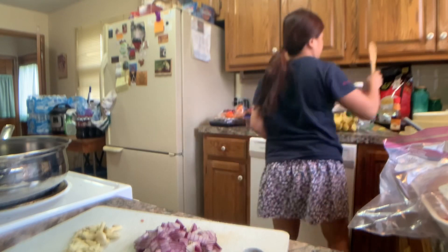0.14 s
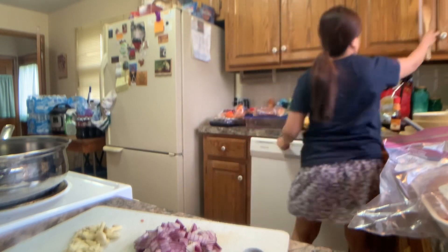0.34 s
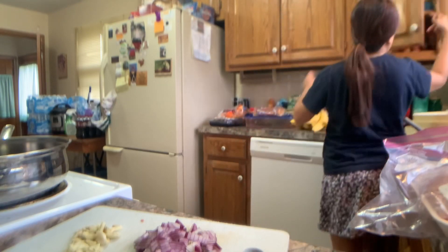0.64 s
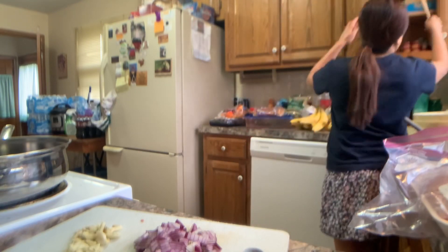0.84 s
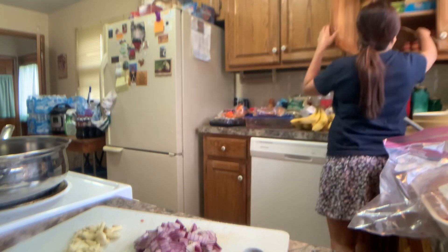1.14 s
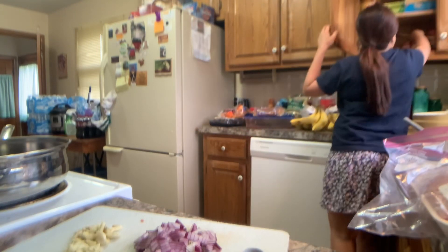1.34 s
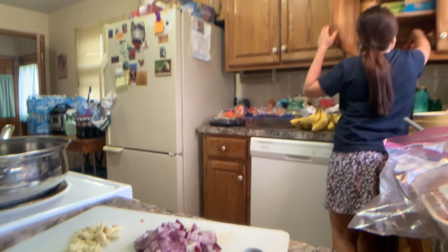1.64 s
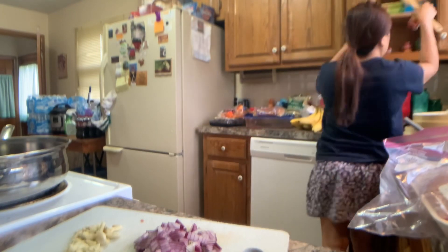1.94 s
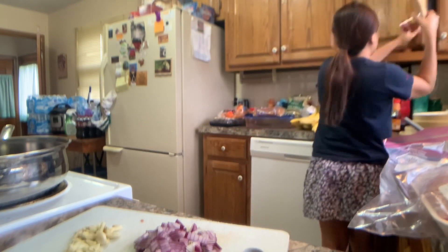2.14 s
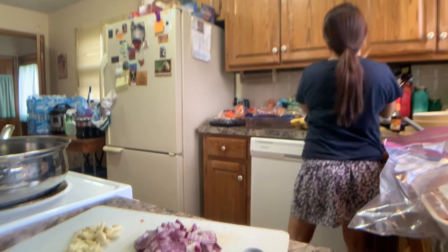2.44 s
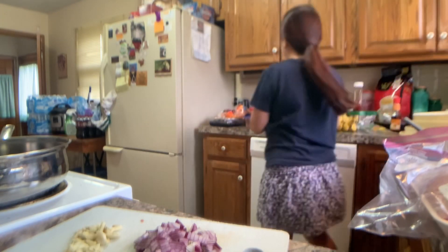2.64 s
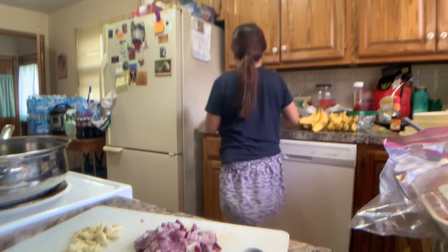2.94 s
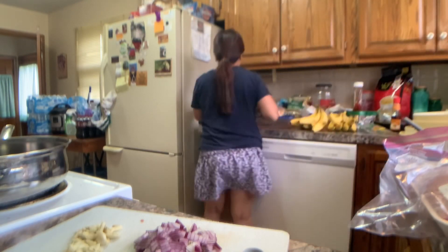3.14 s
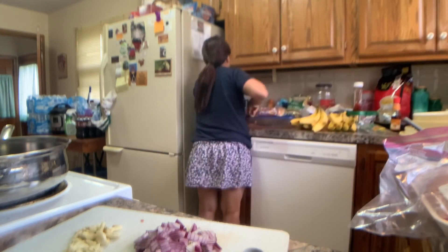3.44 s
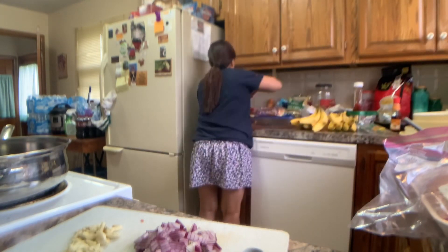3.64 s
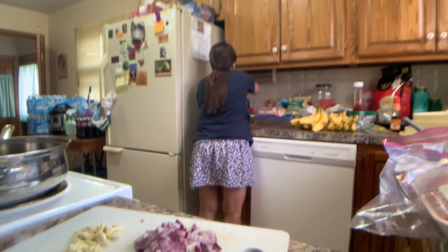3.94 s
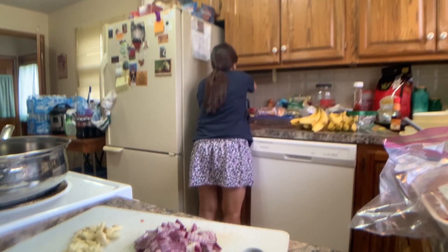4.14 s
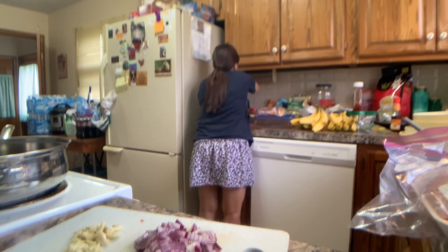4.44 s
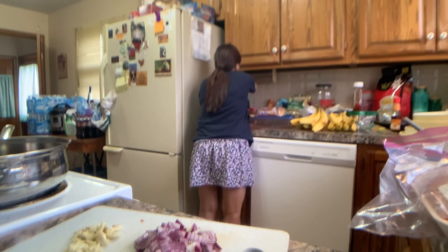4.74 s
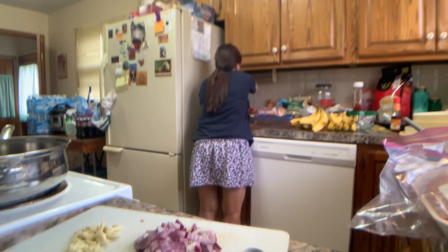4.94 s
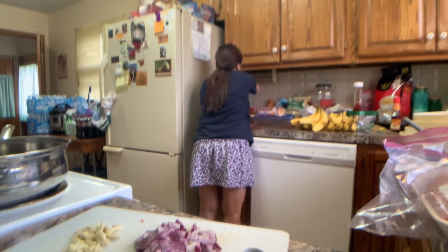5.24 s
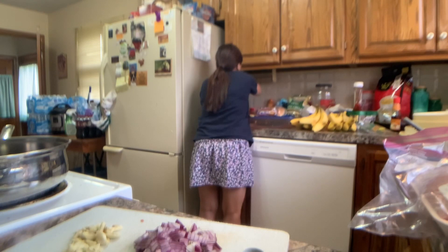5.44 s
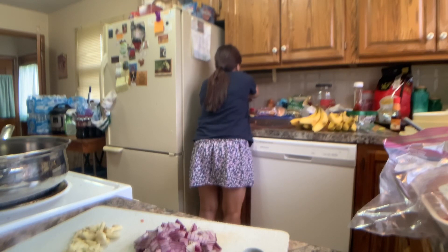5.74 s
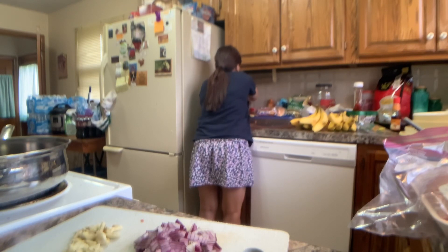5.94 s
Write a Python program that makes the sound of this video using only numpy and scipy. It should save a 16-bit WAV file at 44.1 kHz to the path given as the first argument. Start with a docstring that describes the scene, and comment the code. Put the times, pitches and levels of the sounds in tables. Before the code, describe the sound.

A low, slightly unsteady refrigerator hum with soft fan noise runs throughout a small, fairly dry kitchen, heard in stereo from a few steps away. At 0.1-0.5 s a dishwasher door closes: light click, strong clack at 0.3 s, dull thuds and movement. A cupboard catch snaps at 1.2 s. Between 1.4 and 1.75 s tins and jars knock on the shelf, with a brief scrape and a bright hard knock near 1.57 s. At about 2.5 s the cupboard door slams with a deep, short boom, the loudest event. Cloth and hands rustle around 2.9-3.5 s, with a clunk of dish and pot at 3.25-3.4 s and a low footstep-like thud. From 3.9 to 5.8 s come sparse, quiet taps, small ticks and faint crinkles on the worktop. Just after 6.0 s a rough, groaning drag on wood rises abruptly as it ends.

```python
"""A refrigerator hums throughout (tones and fan noise) in a kitchen heard by a two-port microphone.
A dishwasher door latches; jars and tins knock and slide on a cupboard shelf; the cupboard door thumps shut.
Then small things are set down on the worktop, and last something starts to drag on wood (stick-slip pulses).
Knocks are noise bursts with decaying modes, thuds are panel modes with rattle; hands, feet and clothes
shuffle along the way as rubbing noise. Struck and sliding things get a diffuse room tail."""
import sys
import numpy as np
from scipy import signal
from scipy.fft import rfft, irfft, next_fast_len
from scipy.io import wavfile
from scipy.ndimage import uniform_filter1d, map_coordinates

SR = 44100
rng = np.random.default_rng(int(sys.argv[2]) if len(sys.argv) > 2 else 0)


def log_audio(samples):
    """Write samples as a 16-bit WAV file to the path given in sys.argv[1]."""
    # one column per channel
    frames = np.atleast_2d(samples).T
    # limit to full scale, then quantise
    limited = np.clip(frames, -1, 1)
    pcm = np.round(limited * 32767).astype(np.int16)
    wavfile.write(sys.argv[1], SR, pcm)


N = 268123

# compressor tones: pitch_hz, level_db (rms)
HUM_TONES = [(91.5, -50.5), (172.3, -61), (211.5, -53), (366.1, -63.5), (393.0, -62), (855.9, -77),
             (995.9, -68)]
# fan noise colour: freq_hz, density_db (relative)
FAN_SPECTRUM = [(25, -41.5), (70, -10), (105, 3.5), (140, -11.5), (212, 2), (309, -13.5), (400, -1.5),
                (560, -5.5), (660, -27.5), (780, -11), (1000, -15.5), (1300, -17.5), (1480, -26.5),
                (1700, -20.5), (2600, -30), (5500, -46), (9500, -42.5), (12000, -45), (13000, -75)]
FAN_DB = -50.5

# rubbing noise colour: freq_hz, density_db (relative)
RUSTLE_SPECTRUM = [(300, -36), (700, -6), (1500, -0.5), (3000, -3), (4200, -3), (6000, -7.5), (8000, -9),
                   (10300, -7), (12000, -9), (13000, -25.5), (16000, -19)]
# faint rustle of clothes: time_s, level_db
CLOTHES = [(0, -67.5), (.6, -67), (.8, -74.5), (1.0, -65.5), (1.15, -73), (1.4, -78), (2.0, -72.5),
           (2.2, -77.5), (2.3, -70.5), (2.44, -64), (2.72, -72), (3.58, -71), (3.8, -62.5), (3.92, -69.5),
           (3.97, -79), (5.25, -92), (5.36, -68.5), (5.58, -82)]
CLOTHES_TILT_DB = 2
# strokes of hands, cloth and sliding things: start_s, swell_s, held_s, level_db, treble_tilt_db
STROKES = [(.09, 0.056, 0.25, -60, -0.5), (0.359, 0.03, 0.071, -57.5, 2.5), (0.701, 0.16, 0.038, -60, 3),
           (1.476, 0.057, 0.088, -47, 0.5), (1.68, 0.14, 0.047, -61, -6), (2.5, 0.055, 0.108, -63, 1),
           (2.8, 0.16, 0.16, -63, 2.5), (2.932, 0.048, 0.0389, -51, 6), (3.05, 0.0086, 0.041, -51, -3),
           (3.055, 0.012, 0.12, -50.5, 7.5), (3.146, 0.013, 0.015, -52, 11.5),
           (3.091, 0.05, 0.114, -53, 1.6), (3.36, 0.179, 0.08, -58, 0), (3.498, 0.054, 0.0149, -52.5, 5.5),
           (5.52, .05, 0.01, -77.5, 9.5), (5.78, 0.039, 0.045, -67.5, 6), (5.89, 0.042, 0.063, -64, 5.5)]
SWELL_DB, FADE_DB_PER_S = 36, 296  # climb over one swell_s; fall after the hold

# tin and shelf resonances: centre_hz, width_hz, level_db
SLIDE_RESONANCES = [(603, 21, -0.5), (802, 48, -3), (1350, 120, -12.5), (2310, 120, -9.5),
                    (3130, 150, -12.5)]
SLIDE_START_S, SLIDE_HOLD_S, SLIDE_EDGE_S, SLIDE_DB = 1.462, 0.042, 0.0068, -42.5

# dragged wood resonances: centre_hz, width_hz, level_db
DRAG_RESONANCES = [(232.6, 54, -2), (455, 46, 0), (581, 40, 1), (766, 51, -7), (990, 150, -15.5),
                   (1370, 97, -25), (2014, 76, -39)]
# course of the drag: time_s, slip_rate_hz, level_db
DRAG_COURSE = [(6.013, 644, -52.5), (6.02, 590, -40), (6.026, 446, -33), (6.037, 490, -26.5),
               (6.046, 370, -30.5), (6.052, 590, -28.5), (6.063, 490, -27.5), (6.072, 520, -25),
               (6.08, 480, -24)]
SLIP_WANDER = 0.03  # share of chance in the slip rate

# soft blows on panels and floor, and a low sound at the very opening: start_s, level_db, pitch_hz, t60_s,
# rattle_db
THUDS = [(0.004, -33.5, 161, 0.079, -4), (0.1, -29, 233, 0.08, -5), (0.13, -24, 78, 0.087, -6.5),
         (0.201, -34, 127, 0.17, 2), (0.294, -22, 350.4, 0.14, -1.5), (0.348, -17.5, 88, 0.07, -14),
         (0.408, -28.5, 203, 0.066, 0), (0.475, -35, 132.6, 0.29, -11), (0.53, -28.5, 112, 0.06, -8),
         (1.1753, -28.5, 279, 0.24, -12), (1.416, -43.5, 213, 0.7, -4), (1.421, -33.5, 240, 0.054, -23),
         (1.502, -26, 190, 0.028, 2.5), (1.568, -31.5, 249, 0.089, 7), (1.676, -31.5, 220, 0.1, -4),
         (1.744, -23.5, 259, 0.057, -14), (1.7516, -26.5, 260, 0.037, -8), (2.43, -19, 178, 0.047, -12),
         (2.487, -39, 880, 0.15, -13), (2.493, -30, 428, 0.098, -12), (2.5048, -7.5, 169, 0.048, -14),
         (2.534, -28, 152, 0.057, 6), (2.577, -34, 276.6, 0.17, -9), (2.569, -27.5, 133.6, 0.18, -20),
         (2.612, -23, 125.5, 0.14, -20), (2.77, -34, 199, 0.11, -5.5), (2.85, -33, 177, 0.098, -21),
         (3.055, -41.5, 192, 0.26, 3), (3.083, -33, 175, 0.14, -14), (3.253, -31.5, 249, 0.12, 6),
         (3.379, -21, 173.7, 0.1, 0.5), (3.381, -20, 277, 0.069, 2), (3.394, -16, 86, 0.08, -1.5),
         (3.916, -37.5, 220.3, 0.24, -3.5), (5.447, -38, 303, 0.065, -5)]
# cupboard door meets its frame: start_s, level_db
DOOR_SLAM = (2.4698, -5)
# door modes: pitch_hz, level_db, t60_s
DOOR_MODES = [(44.6, -9, 0.12), (145, -8, 0.18), (204.4, 11, 0.045), (250, -13.5, 0.15),
              (311, -20.5, 0.113), (580, -24, 0.056), (874, -60, 0.17)]
# air shut inside the cupboard: pitch_hz, level_db, t60_s
CAVITY_MODE = (111.4, -0.38, 0.16)

# hard contacts: contact_s, level_db, mid_colour_db, treble_colour_db, t60_s, thing
KNOCKS = [(0.099, -31.5, -22, -14.5, 0.069, "latch"), (0.1968, -40.5, 17, -14, 0.046, "latch"),
          (0.2902, -7, -3, -6.5, 0.036, "latch"), (0.473, -33.5, -8, -18, 0.11, "latch"),
          (0.527, -27, -1, -49, 0.012, "jar"), (1.1682, -14.5, -12.5, -38.5, 0.017, "catch"),
          (1.2548, -41, -9, -18, 0.051, "tin"), (1.419, -33, -10.5, -11.5, 0.03, "catch"),
          (1.525, -26, -19, -21, 0.026, "tin"), (1.571, -8, -9, -12, 0.024, "jar"),
          (1.671, -31, -2.5, -12.5, 0.029, "tin"), (1.7389, -30, -12, -16.5, 0.057, "tin"),
          (2.256, -52.5, 8, -10, 0.17, "tin"), (2.428, -40.5, 5, -27, 0.034, "worktop"),
          (2.469, -14, -5, -19, 0.03, "worktop"), (2.552, -35.5, -3, -25, 0.04, "worktop"),
          (2.606, -41, -1.5, -32, 0.076, "worktop"), (3.051, -23, -12, -43, 0.022, "worktop"),
          (3.146, -58, -4, 3.5, 0.03, "foil"), (3.236, -27, -2, -8, 0.026, "catch"),
          (3.2534, -23, -0.5, -16, 0.039, "dish"), (3.3764, -16, -5, -21, 0.045, "pot"),
          (3.874, -46.5, 9.5, 3, 0.07, "lid"), (3.8878, -27, -14, -23, 0.019, "worktop"),
          (3.934, -41, 5, -9.5, 0.027, "worktop"), (4.055, -56.5, -14.5, -6.5, 0.062, "worktop"),
          (4.1676, -58, 16.5, -3.5, 0.039, "worktop"), (4.2105, -35, 1, -24.5, 0.029, "worktop"),
          (4.75, -34, -1.5, -27, 0.022, "board"), (5.025, -48, -4, -11, 0.05, "worktop"),
          (5.0483, -35, 8, -16, 0.014, "cup"), (5.1768, -62.5, 20, -10.5, 0.035, "foil"),
          (5.214, -43.5, -24.5, -20.5, 0.028, "spoon"), (5.2753, -57, -8.5, 0, 0.028, "foil"),
          (5.34, -68, -5.5, -1.5, .04, "foil"), (5.43, -45.5, 7, -23, 0.044, "worktop"),
          (5.832, -37, -29, -10, 0.025, "lid")]
# modes by struck thing: pitch_hz, level_db, t60_s
THING_MODES = {"latch": [(403, -7, 0.068), (845, -2.5, 0.048), (1084, -13.5, 0.11), (1300, -8.5, 0.052),
               (2426, 4.5, 0.012), (3470, -6.5, 0.018), (6650, -10, 0.0164)], "jar": [(1660, -10.5, 0.033),
               (1870, 7, 0.0084), (2080, -9.5, 0.011), (2680, -7, 0.018), (2980, -16.5, 0.026),
               (3140, -1, 0.0066), (3850, -40, 0.017), (3900, -9, 0.0061)], "tin": [(750, -16, 0.065),
               (1370, -12, 0.029), (2160, 3.5, 0.017), (4200, -10, 0.012)], "worktop": [(925, -12, 0.026),
               (1040, -11, 0.051), (2486, -4.5, 0.013), (4220, -39, 0.035)], "spoon": [(3000, -7, 0.0054),
               (3950, 5, 0.0069), (4260, 7, 0.0078), (10000, 2, 0.006)], "cup": [(997, 1, 0.031),
               (4300, 8, 0.0043), (5290, 9, 0.0047), (5850, 3, 0.0028)], "foil": [(9800, 20, 0.0079),
               (11700, 11.5, .006)], "catch": [(982, -8.5, 0.027), (1774, 1, 0.018), (2076, -5.5, .016),
               (2610, -6.5, .014), (3130, -1.5, .012), (3400, -13, .014), (4150, -8.5, 0.013),
               (4600, -16, .012)], "dish": [(843, 2, 0.025), (1100, -17, 0.029), (1480, -23, 0.022),
               (2450, -4, 0.026), (3630, -10, 0.022), (5200, -16, .015)], "pot": [(537, -9, .06),
               (872, -10, 0.038), (1850, -6, 0.033), (2640, -17, 0.018), (3180, -11, 0.029),
               (3960, -23, 0.016), (5790, -0.5, 0.013)], "board": [(1000, -5, .04), (2460, 3, 0.015),
               (3530, -6, 0.012)], "lid": [(910, -12, 0.041), (7340, 6.5, 0.012)]}
# direct-sound boost by struck thing, for how it faces the microphone: boost_db
NEAR_DB = {"latch": 0.5, "jar": 2.5, "tin": -2.1, "worktop": -1.3, "spoon": 2.5, "cup": 1, "foil": 1, "lid":
           0, "catch": 3.5, "dish": 1, "pot": 1, "board": 2.5}
KNOCK_RISE_S = 0.0035
CRACK_DB, CRACK_T60_S = 2.5, 0.015  # first instant of contact, over the chatter
LEAD_S, LEAD_DB = 0.006, -17.5  # soft noise lead-in before each knock
UNEVEN_DB, UNEVEN_HZ = 3.5, 270  # chatter stutter
RING_TO_ROOM = 0.65  # share of the rings that reaches the walls

# room decay: freq_hz, t60_s
ROOM_DECAY = [(100, 0.61), (300, 0.21), (1000, 0.17), (5000, 0.19), (13000, 0.17)]
DIRECT_DB = -4  # direct sound beside the room tail
# left-right likeness in a diffuse field: freq_hz, correlation (-1 to 1)
PORT_LIKENESS = [(60, 1), (250, 0.89), (430, 0.13), (520, -0.55), (660, -0.52), (850, 0.47), (1500, 0.14),
                 (12000, -0.4)]
# port colour: freq_hz, left_minus_right_db
PORT_COLOUR = [(60, 3.5), (200, 3), (400, 7), (550, -1.5), (950, -5), (1250, -0.5), (4400, 0), (7000, -3),
               (9500, -10), (12000, -3)]
LAG_S, BASS_CUT_HZ, TOP_HZ = 0.000259, 65, 15900  # left port lag; band limits


def amp(db):
    """Decibels to amplitude."""
    return 10 ** (np.asarray(db) / 20)


def unit(x):
    """Scale to rms 1."""
    return x / np.sqrt(np.mean(x ** 2) + 1e-20)


def along(points, hz):
    """Interpolate (freq_hz, value) points on a log frequency axis."""
    freq_hz, value = np.transpose(points)
    return np.interp(np.log(hz + 1), np.log(freq_hz + 1), value)


def curves(rows):
    """One value per sample for each column after the time."""
    time_s, *columns = np.transpose(rows)
    return [np.interp(np.arange(N) / SR, time_s, column) for column in columns]


def wobble(rate_hz):
    """Smooth random curve with rate_hz knots a second."""
    knots = rng.standard_normal(int(N * rate_hz / SR) + 4)
    return map_coordinates(knots, [np.arange(N) * rate_hz / SR])


def filtered(x, response):
    """Apply a complex response of frequency, zero-padded."""
    n = x.shape[-1]
    size = next_fast_len(n + 8192)
    return irfft(rfft(x, size) * response(np.fft.rfftfreq(size, 1 / SR)), size)[..., :n]


def resonant(peaks):
    """Response of (centre_hz, width_hz, level_db) resonances, alternating in sign."""
    def response(f):
        total = 0
        for k, (centre_hz, width_hz, db) in enumerate(peaks):
            loss = 1j * f * width_hz
            total = total + (-1) ** k * amp(db) * loss / (centre_hz ** 2 - f ** 2 + loss)
        return total
    return response


def diffuse(pair):
    """Mix two unrelated signals to the likeness that the ports hear in a diffuse field."""
    def mid_side(hz):
        angle = np.arccos(np.clip(along(PORT_LIKENESS, hz), -1, 1)) / 2
        return np.array([np.cos(angle), np.sin(angle)])
    mid, side = filtered(pair, mid_side)
    return np.array([mid + side, mid - side])


def hiss(spectrum, patchy_db):
    """Coloured stereo noise of rms 1 with time-frequency patches of random gain."""
    z = signal.stft(rng.standard_normal((2, N)), nperseg=512)[2]
    patches = uniform_filter1d(rng.standard_normal(z.shape[1:]), 6, 0)
    patches = unit(uniform_filter1d(patches, 10, 1))
    pair = signal.istft(z * amp(patchy_db * patches), nperseg=512)[1][:, :N]
    return unit(diffuse(filtered(pair, lambda hz: amp(along(spectrum, hz)))))


def add(track, start_s, sound):
    """Lay a sound into a track from start_s on."""
    part = track[..., round(start_s * SR):][..., :sound.shape[-1]]
    part += sound[..., :part.shape[-1]]


def ring(t, pitch_hz, t60_s, rise_s):
    """A struck mode: a sine with exponential rise and decay."""
    return np.sin(2 * np.pi * pitch_hz * t) * amp(-60 * t / t60_s) * (1 - np.exp(-t / rise_s))


def kitchen(sound, near_db=0):
    """Direct sound plus a fresh diffuse tail, each frequency dying at its own speed."""
    hz, t, z = signal.stft(rng.standard_normal((2, SR // 2)), SR, nperseg=256)
    decay = amp(-60 * t / along(ROOM_DECAY, hz)[:, None])
    tail = signal.istft(z * decay, SR, nperseg=256)[1]
    tail = diffuse(tail / np.linalg.norm(tail[0]))
    heard = signal.fftconvolve(sound[None], tail, axes=1)
    heard[:, :len(sound)] += amp(DIRECT_DB + near_db) * sound
    return heard


def fridge():
    """Slightly unsteady compressor tones over the rush of the fan."""
    t = np.arange(N) / SR
    tones = 0
    for hz, rms_db in HUM_TONES:
        wander_db = hz / 100 * 0.34 * np.clip(wobble(22.0), -2, 2) / (1 + hz / 400)
        phase = 2 * np.pi * hz * t + 0.5 * wobble(4.4) + rng.uniform(0, 2 * np.pi)
        tones = tones + amp(rms_db + 3.0 + wander_db) * np.sin(phase)  # +3 dB: rms to peak
    return tones + amp(FAN_DB + 0.46 * wobble(4.6)) * hiss(FAN_SPECTRUM, patchy_db=1.5)


def shuffling():
    """Grainy rubbing noise; strokes swell, hold and fade, their tilt trading treble against middle."""
    t = np.arange(N) / SR
    clothes_db, = curves(CLOTHES)
    high, low = amp(clothes_db + CLOTHES_TILT_DB), amp(clothes_db - CLOTHES_TILT_DB)
    for start_s, swell_s, held_s, db, tilt_db in STROKES:
        swell_db = SWELL_DB * np.maximum(start_s - t, 0) / swell_s
        fade_db = FADE_DB_PER_S * np.maximum(t - start_s - held_s, 0)
        level = amp(db - swell_db - fade_db)
        high = np.hypot(high, amp(tilt_db) * level)
        low = np.hypot(low, amp(-tilt_db) * level)
    rub = hiss(RUSTLE_SPECTRUM, patchy_db=1.4)
    treble = filtered(rub, lambda hz: 1 / (1 + (7500 / (hz + 1)) ** 6))
    grains = amp(2.1 * wobble(40) + 1.1 * wobble(350))
    return grains * (high * treble + low * (rub - treble))


def slide():
    """Friction noise shakes the resonances of tin and shelf."""
    t = np.arange(SR // 4) / SR
    fade_in = 1 - np.exp(-(t / SLIDE_EDGE_S) ** 2)
    fade_out = np.exp(-np.maximum(t - SLIDE_HOLD_S, 0) / SLIDE_EDGE_S)
    grit = rng.standard_normal(len(t)) * amp(2.2 * wobble(150)[:len(t)])  # contact catches unevenly
    scrape = unit(filtered(grit, resonant(SLIDE_RESONANCES)))
    out = np.zeros((2, N))
    add(out, SLIDE_START_S, amp(SLIDE_DB) * kitchen(fade_in * fade_out * scrape))
    return out


def drag():
    """Uneven stick-slip pulses and scraping noise shake the wood's resonances; the contact hisses too."""
    slip_hz, level_db = curves(DRAG_COURSE)
    level = amp(level_db) * (np.arange(N) / SR > DRAG_COURSE[0][0])
    slip_count = np.floor(np.cumsum(slip_hz * (1 + SLIP_WANDER * wobble(200))) / SR)
    slips = np.diff(slip_count, prepend=0) * amp(0.45 * wobble(250))
    scrape = 0.47 * diffuse(rng.standard_normal((2, N)))
    wood = resonant(DRAG_RESONANCES)
    groan = unit(filtered(unit(slips) + scrape, lambda f: wood(f) * f / (f + 400)))
    contact_hiss = amp(-10.5 + 0.72 * wobble(120)) * hiss(RUSTLE_SPECTRUM, patchy_db=2.5)
    return level * (groan + contact_hiss)


def thuds():
    """Soft blows each ring a panel mode and shake out a dull rattle."""
    out, t = np.zeros((2, N)), np.arange(SR // 3) / SR
    dull = lambda f: f / (90 + f) / (1 + (f / 450) ** 4)
    for start_s, db, hz, t60_s, rattle_db in THUDS:
        rattle = unit(filtered(rng.standard_normal(len(t)), dull))
        rattle = amp(rattle_db - 60 * t / t60_s) * (1 - np.exp(-t / 0.017)) * rattle
        sound = ring(t, hz, t60_s, 0.61 / hz) + rattle
        add(out, start_s, amp(db) * (sound + 0.47 * kitchen(sound)[:, :len(t)]))
    return out


def door_slam():
    """The cupboard door rings all its modes after a cushioned blow; the trapped air pushes back."""
    out, t = np.zeros((2, N)), np.arange(SR // 3) / SR
    start_s, slam_db = DOOR_SLAM
    # each mode builds over about a cycle
    door = sum(amp(db) * ring(t, hz, t60_s, 1.08 / hz) for hz, db, t60_s in DOOR_MODES)
    air_hz, air_db, air_t60_s = CAVITY_MODE
    door -= amp(air_db) * ring(t, air_hz, air_t60_s, 0.0017)
    add(out, start_s, -amp(slam_db) * (door + 0.087 * kitchen(door)[:, :len(t)]))
    return out


def knock_colour(mid_db, treble_db):
    """Chatter spectrum of a contact: freq_hz, level_db."""
    return [(250, mid_db - 8.0), (400, mid_db - 19.0), (650, mid_db + 2), (900, mid_db + 14.5),
            (1500, mid_db / 2 + 5.0), (3000, 0.0), (4200, -4.0), (5300, treble_db * 0.39 + 0.5),
            (7000, treble_db + 7.0), (10000, treble_db + 11.5), (12200, treble_db + 8.0),
            (13200, treble_db - 0.5), (16000, treble_db - 5.5)]


def knocks():
    """Each hard contact is a burst of coloured chatter plus the short rings of the struck thing."""
    out, clock = np.zeros((2, N)), np.arange(SR // 5) / SR
    t = np.maximum(clock - LEAD_S, 0)  # time since contact
    crack = amp(CRACK_DB - 60 * t / CRACK_T60_S) * (1 - np.exp(-(t / 0.0033) ** 2))
    lead_in = amp(LEAD_DB - 60 * t / CRACK_T60_S) * np.minimum(clock / LEAD_S, 1) ** 2
    for contact_s, db, mid_db, treble_db, t60_s, thing in KNOCKS:
        colour = knock_colour(mid_db, treble_db)
        burst = (1 - np.exp(-t / KNOCK_RISE_S)) ** 2 * amp(-60 * t / t60_s)
        noise = filtered(rng.standard_normal(len(t)), lambda f: amp(along(colour, f)))
        knots = rng.standard_normal(SR // 500)
        stutter = amp(UNEVEN_DB * np.interp(t * UNEVEN_HZ, np.arange(len(knots)), knots))
        chatter = noise * (burst + crack + lead_in) * stutter
        rings = sum(amp(level_db) * ring(t, hz, fade_s, min(KNOCK_RISE_S, fade_s / 4))
                    for hz, level_db, fade_s in THING_MODES[thing])
        near_db = NEAR_DB[thing]
        heard = kitchen(chatter + RING_TO_ROOM * rings, near_db)
        heard[:, :len(t)] += (1 - RING_TO_ROOM) * amp(DIRECT_DB + near_db) * rings  # direct only
        add(out, contact_s - KNOCK_RISE_S / 2 - LEAD_S, amp(db) * heard)
    return out


def scene():
    """Sum of all sources, background first."""
    return fridge() + shuffling() + slide() + drag() + thuds() + door_slam() + knocks()


def record(dry):
    """Ports differ in colour and the left one hears late; bass is cut, nothing passes above TOP_HZ."""
    side = np.array([[0.5], [-0.5]])  # left, right

    def response(hz):
        low_cut = (1j * hz / (BASS_CUT_HZ + 1j * hz)) ** 2
        lag = np.exp(-2j * np.pi * side * hz * LAG_S)
        return amp(side * along(PORT_COLOUR, hz)) * lag * low_cut * (hz < TOP_HZ)
    return filtered(dry, response)


dry = scene()
out = record(dry)
log_audio(out)
```